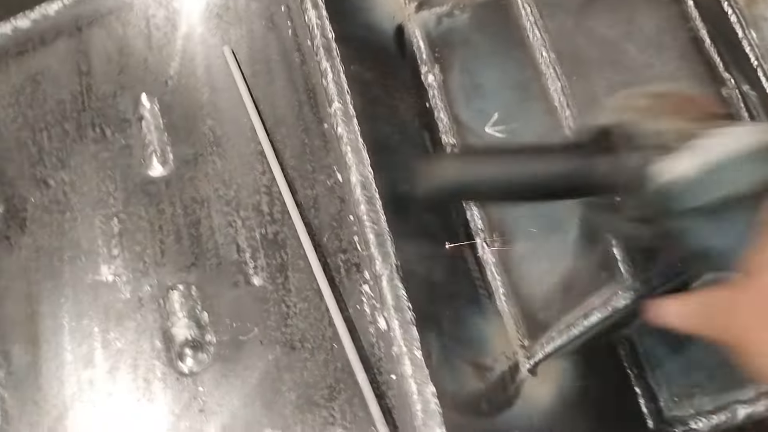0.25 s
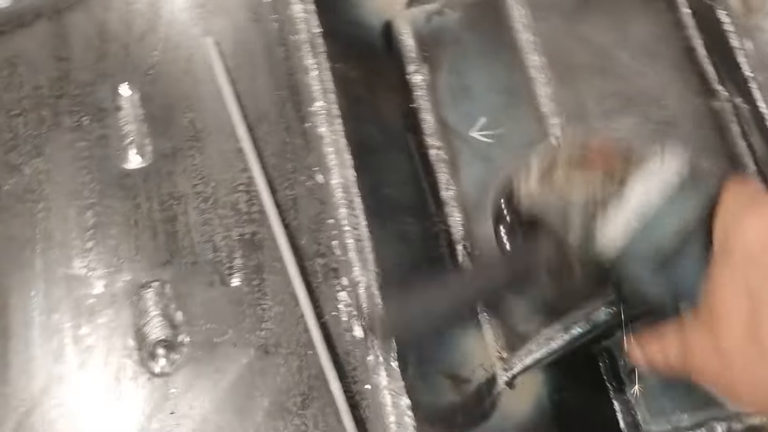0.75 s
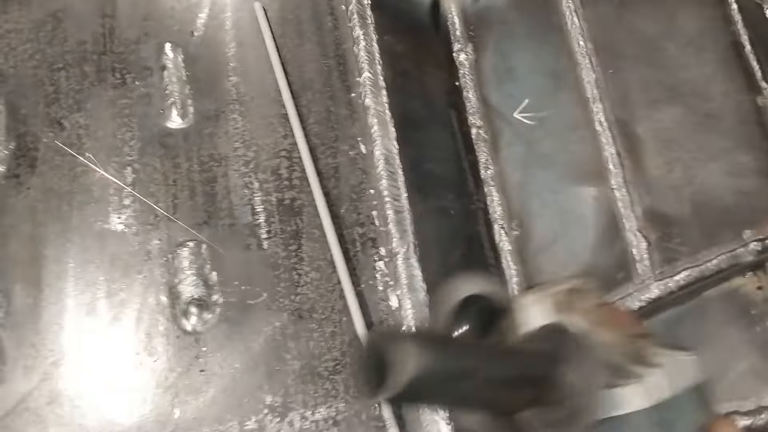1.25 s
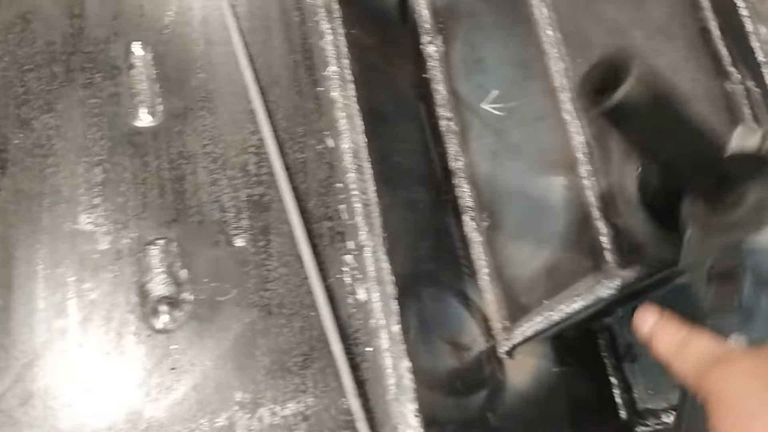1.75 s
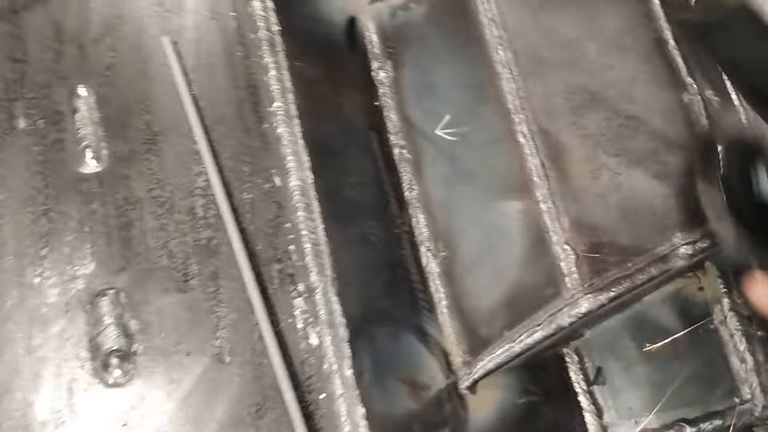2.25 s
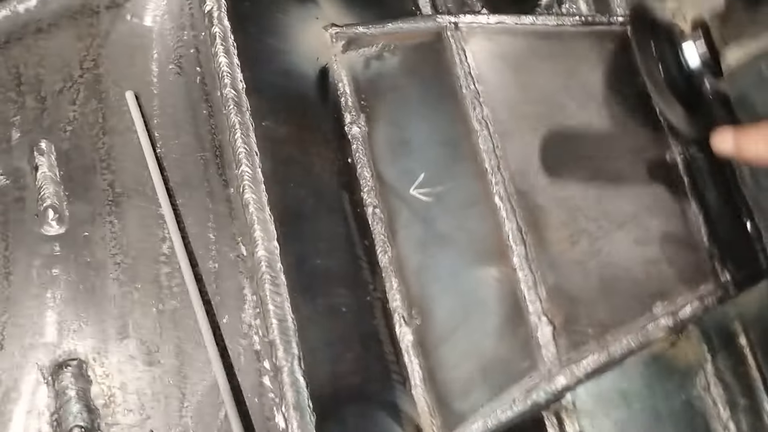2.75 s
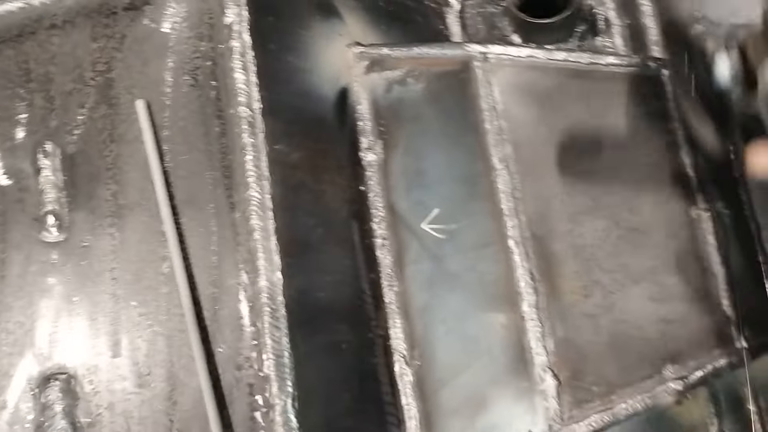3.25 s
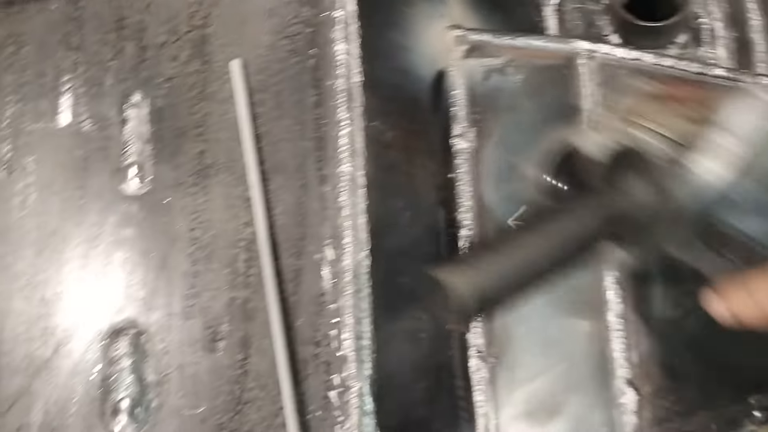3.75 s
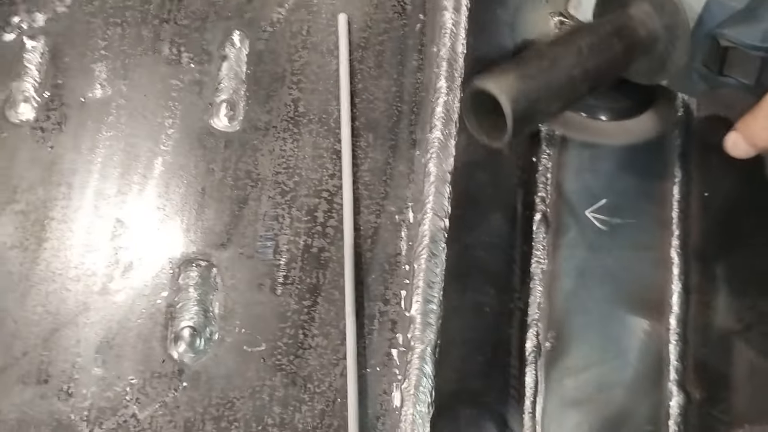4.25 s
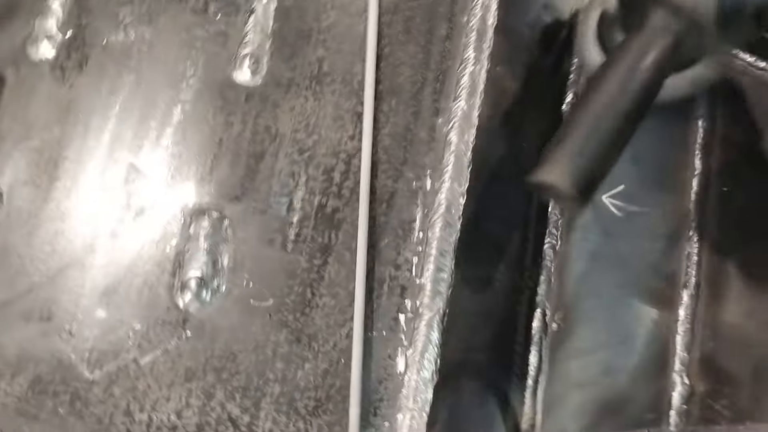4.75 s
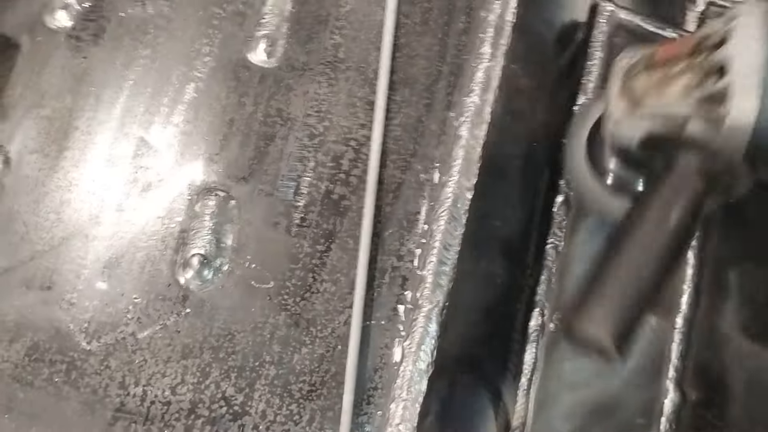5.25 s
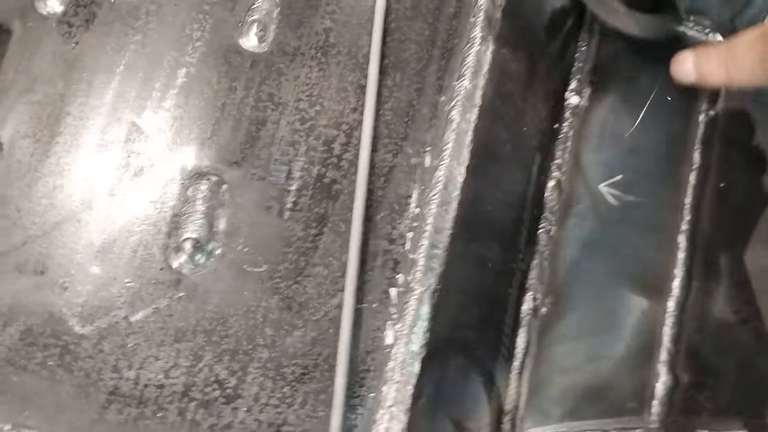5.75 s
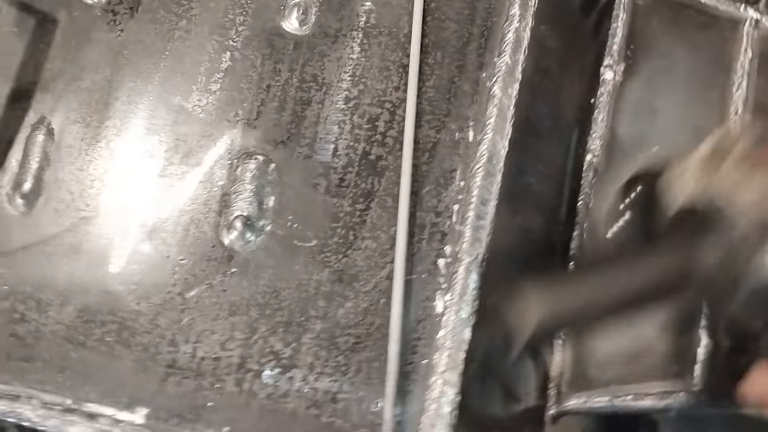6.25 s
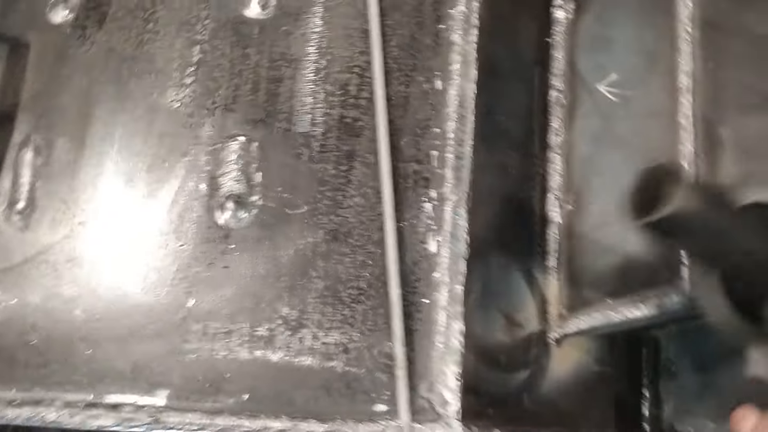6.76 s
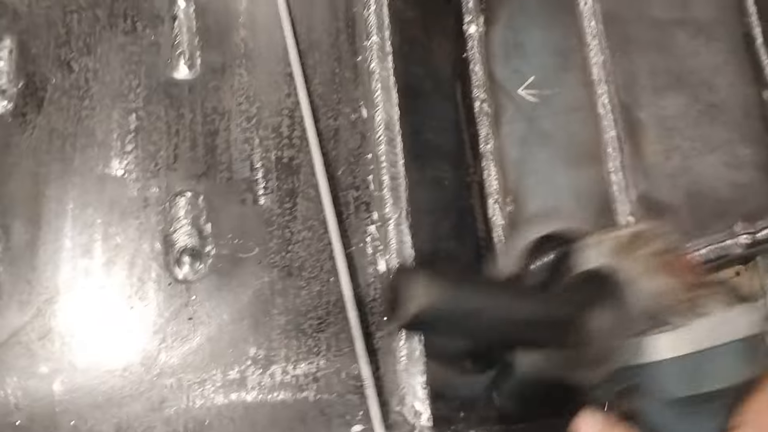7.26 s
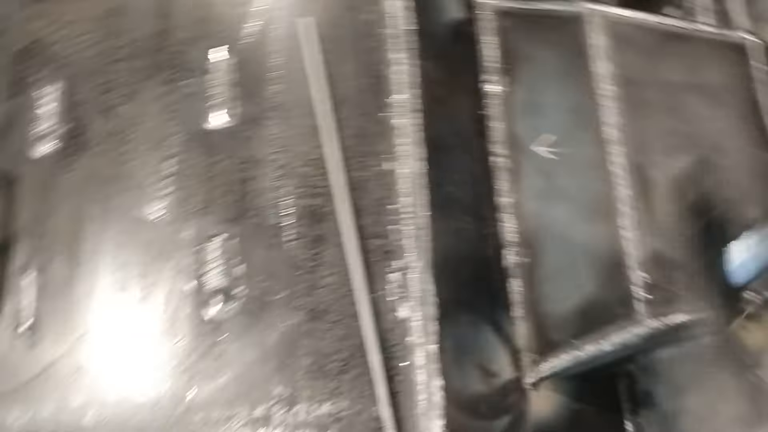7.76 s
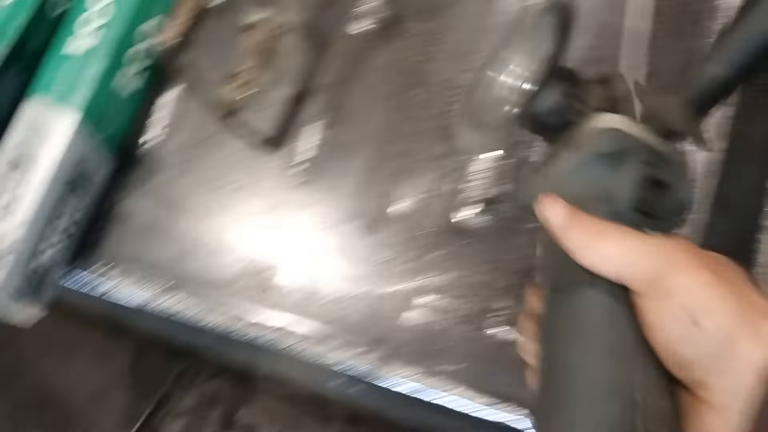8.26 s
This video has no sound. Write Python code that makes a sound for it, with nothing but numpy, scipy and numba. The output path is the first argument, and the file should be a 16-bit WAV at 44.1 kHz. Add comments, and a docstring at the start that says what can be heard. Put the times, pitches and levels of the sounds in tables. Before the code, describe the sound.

Very close to the microphone, an angle grinder runs at full speed from the start, its wire brush scouring welded steel. Dense bright hiss, buzzing hum and gear whine waver in pitch with pressure, while the steel rings in shifting metallic tones. Near the end the power is cut; the whine slides down, the hiss breaks into bursts and gears rattle until the sound stops, still turning.

```python
"""An angle grinder's knotted wire brush scours the weld seams of a steel frame, close to a phone.
From the start the rotor hums, gears and fan whine on its multiples, knots whistle on the geared-down
brush's, the brush beats and rings the steel's modes, and wire-tip noise hisses, throbbing with the mains.
At 7.3 s the drive is cut: the pitch coasts down, the hiss comes in bursts and slack gears rattle;
the plate ring falls further as the brush lifts by 8.3 s."""
import sys
import numpy as np
from scipy import signal
from scipy.fft import rfft, irfft, next_fast_len
from scipy.io import wavfile
from scipy.ndimage import uniform_filter1d, map_coordinates
from numba import njit

SR = 44100
rng = np.random.default_rng(int(sys.argv[2]) if len(sys.argv) > 2 else 0)


def bounce(signal):
    """Save signal as a 16-bit WAV file at the path given by the first command-line argument."""
    frames = np.transpose(np.atleast_2d(signal))
    limited = np.clip(frames, -1, 1)
    pcm = np.round(limited * 32767).astype(np.int16)
    wavfile.write(sys.argv[1], SR, pcm)


N = 374409

PINION_TEETH, CROWN_TEETH, KNOTS = 10, 39, 18
OFF_S = 7.3
TOP_HZ = 14500  # upper band limit

# signs of the (left, right) ports
SIDES = np.array([[1], [-1]])
# tool position: (time [s], left-port lag at apart = 1 [ms])
LAG_MS = [(0, 0.19), (.75, 0.12), (1.25, 0.12), (2.25, 0.15), (2.75, 0.13), (3.75, 0.13), (4.25, 0.078),
          (5.75, 0.096), (6.25, 0.16), (7.25, 0.15), (8.49, .14)]
# port colour: (frequency [Hz], left minus right [dB])
BALANCE_DB = [(60, -3), (110, 4), (200, 1.5), (370, -1.5), (680, -2.5), (1250, 4.5), (2300, 5), (4220, 4),
              (7750, -4), (14200, 4.5)]
# wire hiss: (time [s], level [dB], low mids re level [dB], treble re level [dB], top re level [dB])
HISS = [(0, -18, -33, -1, -15), (0.2, -13, -22, -4, -13), (0.4, -13.5, -20.5, -5, -16),
        (0.6, -14, -8.5, -2, -15.5), (0.78, -14, -25.5, -6, -18), (1.0, -16, -16, 0, -15),
        (1.3, -13.5, -15.5, -5.5, -15), (1.6, -14, -21.5, -5.5, -17), (2.0, -14.5, -14.5, -4, -15.5),
        (2.4, -13.5, -18, -6.5, -18.5), (2.8, -15, -13.5, -0.5, -18), (3.2, -15, -17, -2, -17),
        (3.5, -15.5, -15, 0.5, -15), (3.75, -13.5, -14.5, -4.5, -20), (3.9, -12.5, -27, -8, -17),
        (4.03, -14.5, -13, -5, -17), (4.2, -14.5, -14.5, -6, -17), (4.6, -15, -13.5, -2, -17.5),
        (5.0, -16.5, -12, 1, -19), (5.3, -14.5, -14, -7, -18.5), (5.55, -14, -12, -1.5, -19.5),
        (5.8, -15.5, -8.5, 3.5, -15.5), (6.05, -16.5, -15.5, 1, -18), (6.25, -15, -16.5, 1, -17.5),
        (6.6, -16, -11.5, 3, -14), (6.75, -15, -18.5, 0, -17), (7.0, -14, -18.5, -0.5, -15.5),
        (7.28, -13.5, -23.5, -3.5, -18), (7.4, -14, -15, -9, -15), (7.52, -18, -9, 0, -12),
        (7.65, -16, -5, -5, -9), (7.75, -17.5, -8.5, 0, -9), (7.89, -18, -9, -3, -8.5),
        (7.94, -13, -13, -6, -14), (7.99, -16, -8, -8, -10), (8.05, -15, -9, 0, -12),
        (8.15, -18.5, -5.5, -1, -10), (8.3, -17, -9.5, -5, -12), (8.39, -16.5, -8.5, -3, -12),
        (8.47, -18, -7, -4, -9)]
# wire hiss spectrum: (frequency [Hz], density [dB per Hz, relative])
HISS_COLOUR = [(25, -50), (60, -35), (190, -23.5), (300, -18), (450, -8.5), (1000, -15), (2020, -9.5),
               (2350, -7), (2600, -10.5), (2900, -10.5), (3150, -3), (5500, -2.5), (7750, -3.5),
               (9400, -7.5), (11500, -11), (13000, -8), (14400, -19.5)]


def undb(db):
    """Amplitude ratio of a level in dB."""
    return np.exp(np.asarray(db) * np.log(10) / 20)


def unit(x):
    """Scale to RMS 1."""
    return x / np.sqrt(np.mean(x ** 2))


def curves(table):
    """Columns of a time table, one value a sample."""
    s, *columns = np.transpose(table)
    return [np.interp(np.arange(N) / SR, s, c) for c in columns]


def at(table, hz):
    """A spectrum table read on a log-frequency axis."""
    table_hz, values = np.transpose(table)
    return np.interp(np.log(hz), np.log(table_hz), values)


def walk(rate_hz):
    """Random levels held 1 / rate_hz s and slewed twice; spread near 1."""
    block = 8  # samples per slow step
    hold = int(SR / rate_hz / block)
    steps = np.repeat(rng.standard_normal(N // (block * hold) + 2), hold)
    slow = uniform_filter1d(uniform_filter1d(steps, hold), hold)
    return np.sqrt(2) * np.repeat(slow, block)[:N]


def spells(table):
    """dB added by a list of spells: swell, hold, fade."""
    swell_s = 0.025
    t, edge = np.arange(0, N, 64) / SR, swell_s / 2
    total = 0
    for start, end, db in table:
        corners = [start - edge, start + edge, max(end - edge, start + edge), end + edge]
        total = total + np.interp(t, corners, [0, db, db, 0])
    return np.repeat(total, 64)[:N]


def ports(x, hz, apart=1):
    """The left port hears the tool a little later; the two ports differ in colour, read at hz."""
    t = np.arange(N)
    place = t - apart * curves(LAG_MS)[0] * SR / 1000
    if hz > 2500:  # linear interpolation would dull the treble
        late = map_coordinates(x, [place], order=3, mode="nearest")
    else:
        late = np.interp(place, t, x)
    return np.array([late, x]) * undb(SIDES * at(BALANCE_DB, hz) / 2)


def spindle_turns(turns):
    """Brush turns: rotor turns geared down by pinion and crown."""
    return turns * PINION_TEETH / CROWN_TEETH


def whine(turns, lines, fade_db, wander, apart):
    """Tones on shaft multiples; each fades and wavers by itself at each port as the tool is tilted."""
    step, out = np.gradient(turns), 0
    late = step * curves(LAG_MS)[0] * SR / 1000
    heard = turns - apart * np.array([late, 0 * step])
    for multiple, db in lines:
        multiple = round(multiple)
        in_band = step * multiple < TOP_HZ / SR
        level = in_band * undb(db + fade_db * np.array([walk(5.5), walk(6.3)]))
        drift = wander * (walk(60) + 1.18 * apart * np.array([walk(9.3), walk(8)]))  # cycles
        phase = multiple * heard + rng.random() + drift
        out = out + level * np.sqrt(2) * np.sin(2 * np.pi * phase)
    return out


@njit
def svf(x, g, k):
    """State-variable band-pass whose centre moves; gain 1 at the centre, k = 1 / Q."""
    y = np.empty_like(x)
    for c in range(x.shape[0]):
        band, low = 0., 0.
        for i in range(x.shape[1]):
            v = (band + g[i] * (x[c, i] - low)) / (1 + g[i] * (g[i] + k))
            band, low = 2 * v - band, low + 2 * g[i] * v
            y[c, i] = k * v
    return y


def sliding(hz, stray):
    """Filter tuning of a mode that strays by a share of its pitch as the brush presses and moves."""
    return np.tan(np.pi * hz / SR) * (1 + stray * walk(4.0))


def motor(turns):
    """Unbalance hums once a rotor turn; fan blades and gear teeth whine on its multiples."""
    # rotor hum: (time [s], nominal level [dB])
    hum_curve = [(0, -36.5), (.2, -31), (.55, -23.5), (.67, -26.5), (.76, -34), (.92, -28.5), (1.35, -20.5),
                 (1.5, -28), (2.0, -22), (2.48, -28), (2.76, -21.5), (3.0, -25.5), (3.1, -20), (3.55, -27),
                 (3.75, -25.5), (3.92, -37.5), (4.1, -28.5), (4.42, -24), (4.8, -27.5), (5.0, -22),
                 (5.48, -22), (5.6, -30), (6.0, -31), (6.4, -28), (6.8, -23), (7.0, -29), (7.1, -26),
                 (7.6, -25), (8.25, -31), (8.48, -55)]
    # weaker tones while powered: (rotor multiple, nominal level [dB])
    gear_lines = [(3, -51), (6, -40), (7, -41), (13, -43), (14, -42)]
    # tones around the fan blades: (rotor multiple, level re fan whine [dB])
    fan_lines = [(23, 3.5), (36, -24), (46, -1)]
    # tilted tool aims its fan at the phone: (start [s], end [s], gain re fan_rest_db [dB])
    aim_spells = [(0, .32, 10.5), (.32, .5, 6), (.5, .85, 7.5), (1.62, 1.85, 4), (2.15, 2.35, 6),
                  (2.35, 2.75, -2), (2.75, 3.65, 0.5), (1.05, 1.5, 1.5), (3.72, 3.87, 15), (3.87, 4.0, 1),
                  (4.0, 4.22, 8.5), (4.22, 4.62, -1), (4.62, 4.9, 3), (4.9, 5.3, 3.5), (5.3, 5.7, 0),
                  (5.7, 5.95, 6), (6.1, 6.35, -1.5), (6.35, 6.85, 7), (6.85, 7.28, 6.5), (7.28, 7.4, 3),
                  (7.4, 7.52, 8), (7.52, 7.66, 14.5), (7.66, 7.76, 12), (7.77, 7.99, 1), (7.99, 8.09, 12),
                  (8.09, 8.2, 5), (8.2, 8.34, -5), (8.34, 8.5, 6.5)]
    # tones around the gear mesh: (rotor multiple, usual level [dB])
    mesh_lines = [(8, -38), (9, -37.5), (10, -33.5), (11, -34), (12, -42)]
    # load shifts, one list per mesh_lines row: (start [s], end [s], gain re usual [dB])
    bite_spells = [
        [(0, 1.6, 1), (4.5, 5.6, 8)],
        [(2.3, 2.95, 9), (3.2, 3.62, 9), (3.62, 4.1, 5), (5.0, 5.9, 9), (6.2, 6.75, 7)],
        [(0, .3, 3), (.3, 1.45, 5), (2.6, 3.0, 1), (3.0, 3.6, 8), (4.5, 5.47, 6.5)],
        [(0, .3, 10), (0.5, 1.4, 6), (1.4, 1.85, -2), (1.85, 2.1, 10)],
        [(.85, 1.2, 15), (1.7, 1.85, 17), (2, 3.0, 16.5), (3.08, 3.3, 16), (3.97, 4.3, 12), (6.0, 7.0, -1)],
    ]
    fan_rest_db = -37.5

    hum_level = undb(curves(hum_curve)[0] + 1.57 * walk(30))
    hum = hum_level * np.sqrt(2) * np.sin(2 * np.pi * turns)
    fan_level = undb(fan_rest_db + spells(aim_spells))
    fan = fan_level * whine(turns, fan_lines, fade_db=3.5, wander=0.22, apart=0.15)
    loaded = [(m, db + spells(rows)) for (m, db), rows in zip(mesh_lines, bite_spells)]
    mesh = whine(turns, loaded, fade_db=2.0, wander=0.45, apart=1)
    gears = whine(turns, gear_lines, fade_db=6.5, wander=0.12, apart=0.96)
    powered = np.clip((OFF_S + 0.16 - np.arange(N) / SR) / 0.28, 0, 1)
    return ports(hum, 440) + fan + powered * (mesh + gears)


def rattle(turns):
    """Slack gears knock once a spindle turn, uneven and in gusts, as short damped rings; loud ones listed."""
    # loudest knocks: (time [s], peak before high-pass and port colour [dB], pitch [Hz])
    loud_knocks = [(7.5504, -8, 5360), (7.5854, -7, 4440), (7.673, -5, 4540), (7.6834, -5, 8680),
                   (7.7054, -7, 8580), (7.7777, -4, 6420), (7.8084, -7, 6090), (7.8271, -5, 4510),
                   (7.8374, -10, 8050), (7.8474, -6, 7990), (7.878, -9, 4450), (7.8884, -8, 4480),
                   (7.9224, -6, 4470), (7.9324, -7, 4390), (7.9384, 0, 6740), (7.9504, -6, 7620),
                   (7.9604, -8, 3630), (7.9942, -6, 5330), (8.0014, -6, 7430), (8.0134, -7, 7370),
                   (8.0204, -9, 3400), (8.0284, -5, 7320), (8.0364, -5, 7300), (8.0474, -6, 7230),
                   (8.0731, -3, 7150), (8.1025, -4, 6150), (8.1214, -6, 4010), (8.1564, -8, 6880),
                   (8.1773, -6, 5860), (8.2043, -7, 5820), (8.2234, -11, 3430), (8.2804, -9, 5600),
                   (8.3614, -7, 5460), (8.3714, -6, 4030), (8.3864, -6, 6080), (8.4154, -9, 6010),
                   (8.4557, -9, 7190), (8.4694, -9, 3820)]
    tick_db, gust_db, spread_db, width_hz = -14, 4, 3.5, 750

    out, tail = np.zeros(N + 300), np.arange(300) / SR
    places = np.flatnonzero(np.diff(np.floor(spindle_turns(turns))))
    places = places[places > (OFF_S + .2) * SR]
    delay, size, pitch = rng.random((200, 3))[:len(places)].T
    size_db = tick_db + gust_db * walk(14)[places] - spread_db * np.log(1 - .95 * size)
    small = np.c_[places / SR + .003 * delay, np.minimum(size_db, -7), 3300 + 5000 * pitch]
    for s, db, hz in [*loud_knocks, *small]:
        tones = np.sin(2 * np.pi * hz * tail) + 0.5 * np.sin(2 * np.pi * 1.55 * hz * tail)
        ring = np.exp(-np.pi * width_hz * tail) * tones
        start = min(int(s * SR), N)
        out[start:start + len(tail)] += undb(db) * ring / np.abs(ring).max()
    highpass = signal.butter(2, 1500, "high", fs=SR, output="sos")
    return ports(signal.sosfilt(highpass, out[:N]), 5820, apart=0.15)


def brush(turns):
    """Knots passing the seam whistle at the brush speed, among weaker multiples of its turn."""
    # uneven knots and crown teeth: (brush multiple, nominal level [dB])
    uneven_lines = [(17, -40.5), (19, -52), (23, -49), (24, -42), (25, -38), (40, -39), (41, -36),
                    (42, -43), (46, -44), (48, -38.5)]
    # knots whistle: (start [s], end [s], gain re knot_db [dB])
    whistle_spells = [(.22, .34, 16), (.45, .64, 8), (.64, .74, 15), (.74, .84, 17.5), (.92, .99, 16),
                      (2.2, 2.75, 11), (2.75, 2.88, 13), (4.8, 5.25, 9.5), (6.0, 6.22, 9), (6.22, 6.4, 17),
                      (6.4, 6.56, 13), (6.85, 7.3, 10)]
    knot_db = -43

    spindle = spindle_turns(turns)
    pressed = np.clip((OFF_S + 0.091 - np.arange(N) / SR) / 0.14, 0, 1)
    knot_line = [(KNOTS, knot_db + spells(whistle_spells))]
    knots = whine(spindle, knot_line, fade_db=2.0, wander=0.13, apart=0.43)
    return pressed * (knots + whine(spindle, uneven_lines, fade_db=4.5, wander=0.12, apart=1))


def steel(turns):
    """A high spot beats once a spindle turn, knots whirr, loose wires add noise; all ring the frame's modes."""
    # frame modes: (frequency [Hz], half the bandwidth of each filter pass [Hz], level offset [dB])
    frame_modes = [(132, 71, 0.5), (253, 10.6, 0.5), (672, 9, -2), (876, 12.6, -1.5), (1140, 23, -4),
                   (1246, 8.2, -6), (2267, 14.5, 3.5), (2397, 11.5, 4), (7580, 30, -1), (2270, 460, -1),
                   (1497, 140, 0), (1037, 170, 1), (3140, 150, -6.5), (4230, 360, -1), (2110, 15, -3),
                   (2704, 20, 0.5), (2100.4, 330, 0), (5350, 530, 0), (6050, 700, 0), (7800, 800, 0.5)]
    # faint ring of each mode between spells: level before the offset [dB]
    rest_levels_db = [-57, -52, -48, -50.5, -49.5, -49.5, -44, -45, -33, -37, -43.5, -44.5, -47, -36.5, -53,
                      -47.5, -46, -40, -40, -39.5]
    # brushed spot makes a mode sing, one list per mode: (start [s], end [s], gain re rest [dB])
    sing_spells = [
        [(2.0, 2.9, 1.5), (4.0, 5.4, 7), (5.4, 6.4, 11.5)],
        [(.05, .2, 0), (.45, .72, 9), (.9, 1.45, 7.5), (1.8, 2.75, 10.5), (3.0, 3.4, 3), (3.4, 3.75, 7),
         (4.45, 4.7, 8.5), (4.95, 5.87, 10), (6.35, 7.2, -1), (7.3, 7.7, 11)],
        [(0, .45, 19), (.68, 1.07, 18), (3.76, 4.32, 16), (4.75, 4.92, 14), (5.45, 5.75, 12.5), (5.9, 6.22, 15)],
        [(2.3, 2.9, 13.5), (2.9, 3.5, 13.5), (3.6, 3.8, 11), (4.95, 5.65, 15.5), (7.3, 7.7, 10)],
        [(.9, 1.3, 17.5), (1.3, 1.9, 11.5), (4.0, 4.3, 17), (6.25, 6.62, 13)],
        [(3.75, 3.9, 24.5), (3.9, 4.27, 16), (6.1, 6.3, 15)],
        [(.1, .37, 9), (2.82, 3.05, 14), (3.05, 3.34, 11.5), (3.36, 3.52, 17), (3.52, 3.72, 16.5),
         (6.25, 6.45, 14)],
        [(0, .1, 13.5), (.1, .22, 18), (.22, .45, 16), (.74, .82, 15.5), (.82, 1.0, 7), (3.83, 3.97, 20),
         (3.96, 4.15, 15), (6.5, 6.85, 14)],
        [(.7, .79, 18), (3.82, 4.6, 9.5), (4.95, 5.6, 7), (5.6, 6.0, 12)],
        [(0, 1.0, -1), (1.1, 2.1, 9.5), (2.1, 2.75, 11.5), (3.45, 3.95, 9.5), (4.05, 5.2, 2), (6.2, 7.3, 4.5),
         (7.35, 7.8, 7)],
        [(4.203, 6.207, 12.5)],
        [(8.154, 8.493, 12.5)],
        [(0, .45, 7), (.95, 1.35, 5), (2.3, 2.9, -1), (3.6, 4.3, 6), (4.45, 4.9, 10), (4.9, 5.6, 15),
         (7.0, 7.3, 1)],
        [(2.7, 3.7, 7), (4.6, 5.3, 13.5), (5.3, 5.95, 10), (6.2, 7.0, 6)],
        [(.05, .25, 5), (3.4, 3.7, 21), (5.05, 5.25, 14)],
        [(.1, .35, 10), (3.85, 4.6, 3), (6.3, 7.2, 3)],
        [(1.2, 2.1, 9), (4.05, 4.5, 18), (7.36, 7.78, 18), (8.33, 8.45, 18.5)],
        [(0, .6, 14), (.9, 1.5, 10), (4.2, 4.5, 8), (6.8, 7.35, 13)],
        [(.8, 1.3, 10), (1.7, 2.2, 14), (2.2, 3.05, 14), (4.1, 4.5, 12), (6.2, 6.7, 12)],
        [(.68, .8, 17), (3.1, 3.6, 5), (4.95, 5.6, 14), (5.6, 6.1, 16)],
    ]

    spindle = spindle_turns(turns)
    beat = np.diff(np.floor(spindle), prepend=0) * undb(1.4 * walk(100))
    knots = undb(-15.0) * np.sin(2 * np.pi * (KNOTS * spindle + 0.019 * walk(40)))
    push = unit(beat) + knots + undb(4.0) * rng.standard_normal(N)
    # the far side of the frame reaches each port by its own path
    far = undb(1.0) * rng.standard_normal((2, N))
    low, high = ports(push, 500) + far, ports(push, 3000, apart=0.41) + far
    out = 0
    for (hz, width_hz, db), rest_db, rows in zip(frame_modes, rest_levels_db, sing_spells):
        ring_db = rest_db + spells(rows) + 1.4 * walk(9.5)
        drive, drive_hz = (high, 3000) if hz > 2000 else (low, 500)
        g, k = sliding(hz, 0.003), 2 * width_hz / hz
        # shift the port balance from drive_hz to the mode
        balance_db = at(BALANCE_DB, hz) - at(BALANCE_DB, drive_hz)
        tone = svf(svf(drive, g, k), g, k) * undb(SIDES * balance_db / 2)
        # friction feeds a weak ring and chokes a strong one, so the level stays fairly even
        swing = np.sqrt(uniform_filter1d(np.mean(unit(tone) ** 2, axis=0), SR // 60))
        out = out + undb(db + ring_db) * unit(tone / (swing + 0.31) ** 0.43)
    return out


def sheen(count=30):
    """Wire noise rings the plates' crowded upper modes, each swelling and fading at random."""
    # strongest upper plate modes: frequency [Hz]
    upper_modes_hz = [1680, 3120, 3210, 3316, 4115, 4350, 4510, 4890, 4920, 5300, 5930, 6250, 6800, 8000]
    # a mode stands out, one list per mode: (start [s], end [s], gain re usual [dB])
    glint_spells = [
        [(2.01, 3.6, 10.5), (0.11, 0.82, 13)],
        [(3.65, 4.3, 10), (4.45, 5.6, 10)],
        [(4.7, 5.35, 10)],
        [(4.2, 4.9, 10.5), (5.75, 5.95, 7)],
        [(4.05, 4.3, 6)],
        [(4.7, 4.95, -2), (5.25, 5.95, 7)],
        [(3.3, 3.6, 4), (6.2, 7.0, 5)],
        [(0, 1.3, -2), (4.7, 5.6, 8)],
        [(1.899, 2.269, 4)],
        [(0, .3, 7), (6.8, 7.3, 3)],
        [(.45, 1.5, 0)],
        [(6.249, 6.649, 4)],
        [(2.0, 2.6, 4)],
        [(.3, 1.3, 0), (4.9, 5.5, 13)],
    ]
    lift_s, coast_gain = 8.3, 0.55

    wires = ports(rng.standard_normal(N), 3100) + 1.77 * rng.standard_normal((2, N))
    # the plates sing less once the brush coasts, and hardly at all when it lifts
    touch_s = [OFF_S + .1, OFF_S + .3, lift_s - .15, lift_s]
    touching = np.interp(np.arange(N) / SR, touch_s, [1, coast_gain, coast_gain, .2])
    modes = [(hz, -1.5 + spells(rows)) for hz, rows in zip(upper_modes_hz, glint_spells)]
    modes += [(hz, -1.5) for hz in 1500 * 6.2 ** rng.random(count)]
    out = 0
    for hz, db in modes:
        tone = svf(wires, sliding(hz, 0.0089), 1 / 170)
        lean_db = 2.1 * SIDES * (2 * rng.random() - 2.0)  # to the right
        out = out + undb(db + at(HISS_COLOUR, hz) + 4.07 * walk(7.0) + lean_db) * tone
    return unit(out) * touching * undb(curves(HISS)[0] - 3.0)


def hiss(turns):
    """Wire tips on the seam: noise in third-octave bands that flicker alone and throb with mains and rotor."""
    # centres of the five level curves: frequency [Hz]
    curve_hz = [450, 1200, 5200, 7800, 11500]
    # port likeness: (frequency [Hz], power share common to both ports)
    likeness = [(60, .1), (130, 0.12), (300, 0.79), (600, 0.87), (1400, 0.79), (3000, 0.25), (6500, 0.075),
                (14000, 0.046)]
    mains_hz = 50
    hiss_db, coast_db, chatter_db = -17, -1.5, 1

    t, size = np.arange(N) / SR, next_fast_len(N)
    level_db, mids, treble, top = curves(HISS)
    shifts = np.array([level_db + 0.39 * mids, level_db + mids, level_db, level_db + treble, level_db + top])
    shifts = shifts - shifts.mean(axis=1, keepdims=True)  # HISS_COLOUR sets the mean spectrum
    # throb at twice the mains while powered, and once a rotor turn
    mains = 0.12 * (t < OFF_S) * np.cos(4 * np.pi * mains_hz * t)
    throb = 1 + mains + 0.074 * np.cos(2 * np.pi * turns)
    grain_db = 20 * np.log10(throb) + 1.0 * walk(300) + 0.42 * walk(45)

    common = ports(rng.standard_normal(N), 5400)
    f = np.maximum(np.arange(size // 2 + 1) * SR / size, 1)
    share = np.clip(at(likeness, f), 0, 1)
    own = rfft(rng.standard_normal((2, N)), size)
    mix = np.sqrt(share) * rfft(unit(common), size) + np.sqrt(1 - share) * own
    mix = mix * undb(at(HISS_COLOUR, f) + SIDES * at(BALANCE_DB, f) / 2)
    mix = mix / np.std(irfft(mix * ((f > 3000) & (f < 9000)), size))

    out = 0
    for hz in 32 * 2 ** np.arange(0, 9.1, 1 / 3):
        band = np.cos(np.pi / 2 * np.clip(3 * np.log2(f / hz), -1, 1)) ** 2
        # interpolate between the two nearest level curves
        place = np.interp(np.log(hz), np.log(curve_hz), np.arange(len(curve_hz)))
        low = min(int(place), len(curve_hz) - 2)
        db = shifts[low] + (place - low) * (shifts[low + 1] - shifts[low])
        flicker_db = 1.02 * np.array([walk(4.1), walk(4.52)]) + 1.85 * np.array([walk(20), walk(20)])
        bright = min(hz / 4000, 1)
        out = out + undb(db + flicker_db + bright * grain_db) * irfft(mix * band, size)[:, :N]
    # once the drive is gone the slack brush chatters, so the hiss comes in quick bursts
    coasting = np.clip((t - OFF_S) / 0.21, 0, 1)
    return out * undb(hiss_db + coasting * (coast_db + chatter_db * walk(70)))


def scene():
    """All sources share one rotor, which sags under load and then coasts."""
    # rotor speed before 40 ms smoothing: (time [s], speed [Hz])
    rotor_speed = [(0.0, 519.3), (0.21, 521), (0.33, 501.6), (0.39, 504), (0.49, 510), (0.61, 539),
                   (0.7, 548), (0.74, 535.7), (0.84, 507.3), (1.02, 494.5), (1.12, 497), (1.21, 479.3),
                   (1.34, 480.3), (1.51, 463.5), (1.85, 506), (1.95, 515), (2.03, 498.5), (2.09, 496),
                   (2.21, 518), (2.29, 503), (2.35, 513.7), (2.48, 528.5), (2.67, 516), (2.83, 495.4),
                   (3.02, 484.3), (3.14, 486.7), (3.35, 494.7), (3.53, 480), (3.6, 489.3), (3.82, 539.4),
                   (3.93, 526.9), (3.99, 538.3), (4.1, 534.7), (4.24, 521), (4.34, 497.4), (4.42, 491),
                   (4.5, 494.5), (4.58, 487.7), (4.61, 486.5), (4.76, 513), (4.81, 517.3), (5.02, 475.6),
                   (5.1, 467.6), (5.26, 471.3), (5.33, 478.7), (5.4, 478), (5.6, 525), (5.73, 533),
                   (5.88, 549), (5.93, 543.5), (6.05, 502.4), (6.23, 516), (6.39, 503), (6.52, 517.4),
                   (6.57, 518), (6.66, 495.5), (6.83, 496), (6.92, 488.4), (7.03, 491), (7.29, 491),
                   (7.32, 485.5), (7.4, 445.5), (7.46, 423), (7.59, 397), (7.67, 383.5), (7.71, 370),
                   (7.75, 372), (8.02, 319.3), (8.25, 288), (8.31, 274.6), (8.38, 270.6), (8.48, 254)]
    turns = np.cumsum(uniform_filter1d(curves(rotor_speed)[0], SR // 25)) / SR
    return motor(turns) + rattle(turns) + brush(turns) + steel(turns) + sheen() + hiss(turns)


def record(dry):
    """The phone clips the rare full-scale peak and cuts the top."""
    lowpass = signal.ellip(14, .2, 80, TOP_HZ, fs=SR, output="sos")
    return signal.sosfilt(lowpass, np.clip(dry, -1, 1))


dry = scene()
out = record(dry)
bounce(out)
```